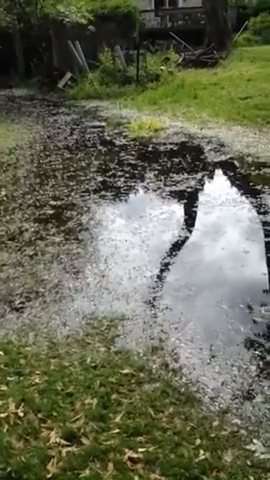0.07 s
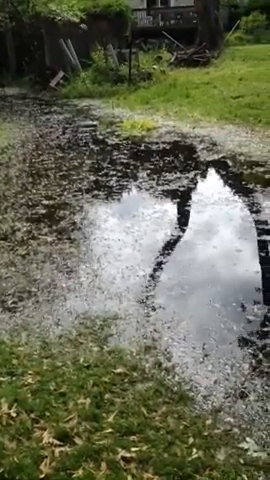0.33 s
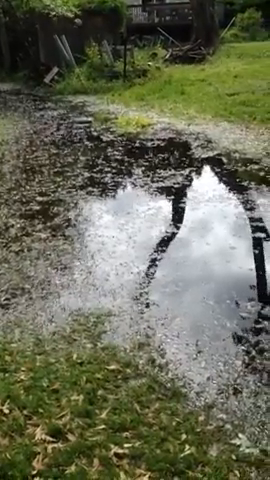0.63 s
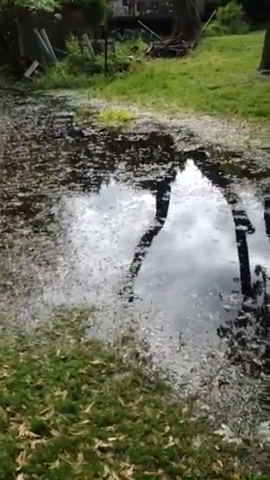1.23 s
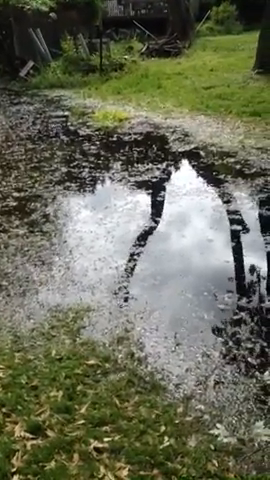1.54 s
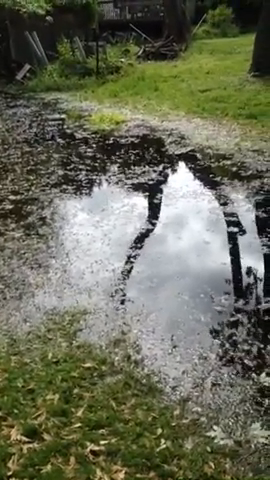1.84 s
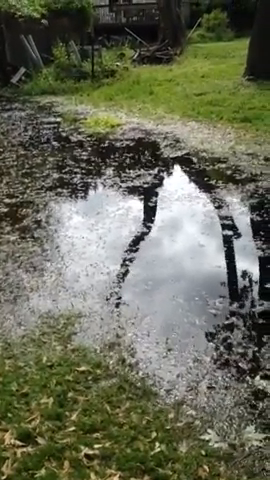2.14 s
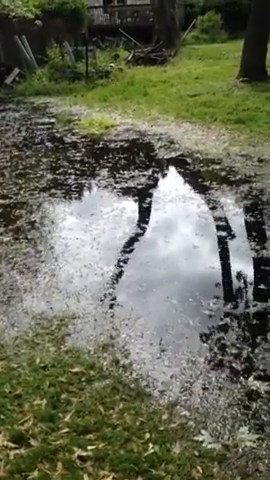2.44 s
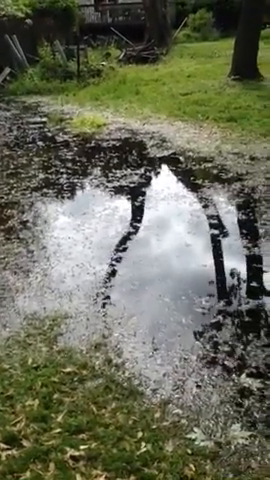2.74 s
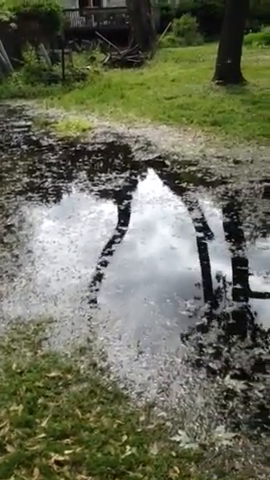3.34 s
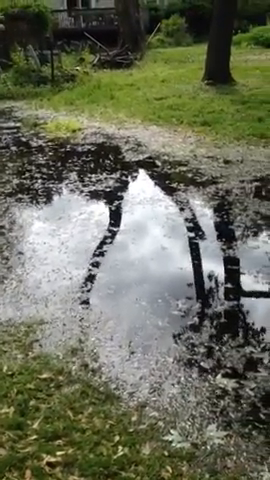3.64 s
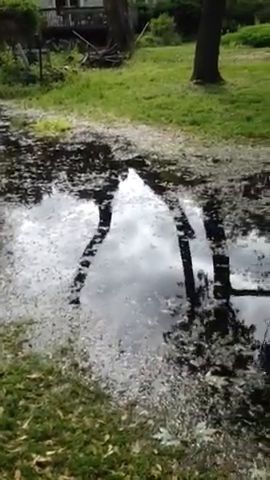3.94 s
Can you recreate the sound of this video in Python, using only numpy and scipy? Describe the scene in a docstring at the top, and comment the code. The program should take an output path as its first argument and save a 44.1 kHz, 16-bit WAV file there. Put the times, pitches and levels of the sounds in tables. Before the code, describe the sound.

Overlapping high, rapid toad trills ring out at a garden pond, thinning as some stop.

```python
"""Garden pond: four toads trill, each a train of short vocal-sac tone pulses at its own pitch and rate.
The lowest stops first, the next slows and stops, a third carries on, a faint high one joins.
The banks return light echoes; trees and lawn scatter a tail.
Behind: low rumble, soft hiss, a distant bird."""
import sys
import numpy as np
from scipy import signal
from scipy.fft import rfft, irfft
from scipy.io import wavfile

SR = 44100
rng = np.random.default_rng(int(sys.argv[2]) if len(sys.argv) > 2 else 0)


def inscribe(sig):
    """Save sig as 16-bit PCM at rate SR to the path in sys.argv[1].

    A 1-D sig is mono; a 2-D sig holds one channel per row.
    Samples are clipped to [-1, 1] before scaling.
    """
    pcm = np.round(np.clip(np.atleast_2d(sig).T, -1, 1) * 32767)
    wavfile.write(sys.argv[1], SR, pcm.astype(np.int16))


N = 176400

# Background spectra (frequency [Hz], relative level [dB])
RUMBLE_SPECTRUM = [(20, -47), (42, -10), (60, -6.5), (90, 1), (130, -3), (200, -10), (300, -19.5),
                   (600, -25.5), (2000, -55)]
HISS_SPECTRUM = [(30, -23), (300, 2.5), (550, -2.5), (800, 1.5), (1200, -2.5), (2400, -7.5), (3700, -5.5),
                 (4800, -7.5), (6500, -11), (10000, -12), (15500, -13)]
# Bird chirps (onset [s], level [dB])
BIRD_CHIRPS = [(.005, -61.5), (.515, -64.5), (1.915, -67.5), (2.512, -62.5)]
# Pitch within a chirp (time from onset [s], pitch [Hz])
CHIRP_PITCH_HZ = [(0, 5200), (.014, 4400), (.026, 3400), (.038, 3960), (.052, 3740), (.065, 3100)]
# Bank echoes (delay [s], gain [dB])
BANK_ECHOES = [(0.0115, -13.5), (0.0236, -21)]
# Toad pulse rates (time [s], rate [Hz])
HIGH_RATE_HZ = [(1.7, 49), (3, 47.8), (4, 46.2)]
LOW_RATE_HZ = [(0, 47.25), (.35, 47.665), (.9, 44.93), (1.17, 44.8)]
MID_RATE_HZ = [(0, 42.03), (.7, 41.7), (1.4, 41.6), (1.9, 40.05), (2.16, 32.7)]
STEADY_RATE_HZ = [(0, 36.85), (2, 37.12), (3, 36.48), (4, 36.9)]
# Toad levels before trim (time [s], level [dB])
HIGH_LEVEL_DB = [(1.7, -82), (2.2, -62), (3.2, -62), (4, -60.5)]
LOW_LEVEL_DB = [(0, -45.5), (.45, -44.5), (.8, -46.5), (1.14, -45.5)]
MID_LEVEL_DB = [(0, -42.5), (.25, -41.5), (.65, -39.5), (1.2, -40.5), (1.7, -41.5), (2.15, -41)]
STEADY_LEVEL_DB = [(0, -41.5), (.6, -43.5), (1.3, -43), (2, -42.5), (2.25, -44.5), (2.62, -43.5),
                   (2.75, -46.5), (3.05, -44), (3.3, -46), (3.48, -43), (3.7, -46), (4, -44)]
# Toad partials (frequency [x pitch], relative level [dB])
HIGH_TIMBRE = [(1, 0)]
LOW_TIMBRE = [(1, 2), (1.38, -27.5), (1.999, -40.5), (3.02, -36), (3.621, -34.5)]
MID_TIMBRE = [(1, 3), (2, -40.5), (3, -40.5)]
STEADY_TIMBRE = [(1, 1.5), (2, -41.5), (2.97, -36)]

TIME_S = np.arange(N) / SR
BINS_HZ = np.fft.rfftfreq(N, 1 / SR)


def amp(db):
    """dB to gain."""
    return 10 ** (np.asarray(db) / 20)


def unit_rms(x):
    """Scale to rms 1."""
    return x / np.sqrt(np.mean(x ** 2) + 1e-20)


def at(curve, time_s):
    """Linear table lookup."""
    return np.interp(time_s, *np.transpose(curve))


def delayed(x, delay_s):
    """Whole-sample delay."""
    return np.pad(x, (round(delay_s * SR), 0))[:N]


def drift(bandwidth_hz):
    """Smooth random signal, rms 1."""
    lowpass = np.exp(-(BINS_HZ / bandwidth_hz) ** 2)
    return unit_rms(irfft(rfft(rng.standard_normal(N)) * lowpass, N))


def noise(spectrum):
    """Shaped noise, rms 1."""
    hz, db = np.transpose(spectrum)
    gain = amp(np.interp(np.log(BINS_HZ + 1), np.log(hz), db))
    return unit_rms(irfft(rfft(rng.standard_normal(N)) * gain, N))


def background(hum_hz=63.9, swell_hz=5):
    """Distant rumble, wavering hum, even hiss."""
    hum_cycles = np.cumsum(hum_hz + 2 * drift(4.9)) / SR
    hum = np.sqrt(2) * np.sin(2 * np.pi * hum_cycles) * amp(-67.5 + 3 * drift(swell_hz))
    rumble = noise(RUMBLE_SPECTRUM) * amp(-60.5 + 1.6 * drift(swell_hz))
    hiss = noise(HISS_SPECTRUM) * amp(-64.5)
    return hum + rumble + hiss


def scatter(x, t60_s, echoes_per_s=2000):
    """Decaying echoes from trees and lawn."""
    lag_s = np.arange(SR // 2) / SR
    taps = rng.standard_normal(len(lag_s))
    taps *= (rng.random(len(lag_s)) < echoes_per_s / SR) & (lag_s > .005)
    taps *= np.exp(-np.log(1000) * lag_s / t60_s)
    return signal.fftconvolve(x, taps / np.linalg.norm(taps))[:N]


def bank_echoes(x):
    """Two reflections off the banks, slowly wavering in level."""
    return sum(amp(db) * (1 + .49 * drift(.67)) * delayed(x, delay_s) for delay_s, db in BANK_ECHOES)


def bird(chirp_s=.065):
    """Rasping chirps that dive, flick up and fall, smeared by the trees."""
    song = np.zeros(N)
    for onset_s, db in BIRD_CHIRPS:
        age_s = TIME_S - onset_s
        pitch_hz = at(CHIRP_PITCH_HZ, age_s) * (1 + .09 * drift(696))
        arch = np.maximum(np.sin(np.pi * np.clip(age_s / chirp_s, 0, 1)), 0)
        song += amp(db) * np.sqrt(arch) * np.sin(2 * np.pi * np.cumsum(pitch_hz) / SR)
    return amp(-2.5) * song + amp(-1.5) * scatter(song, t60_s=.38)


def trill(rate, level, timbre, start_s, stop_s, pitch_hz, sag_hz, pulse_s,
          taper, jitter_cycles, spread_db, trim_db, roughness, detune_hz=7):
    """Vocal-sac tone chopped into rounded pulses; pitch sags through each."""
    rate_hz = at(rate, TIME_S)
    count = np.cumsum(rate_hz) / SR
    count -= np.interp(start_s, TIME_S, count)
    pulse = np.round(count).astype(int)
    offset_s = (count - pulse) / rate_hz  # from pulse centre
    sounding = (pulse >= 0) & (pulse <= np.round(np.interp(stop_s, TIME_S, count)))
    shift, size, bend, stretch = rng.standard_normal((256, 4))[pulse].T  # drawn per pulse
    width_s = pulse_s * np.exp(.098 * stretch)
    envelope = np.maximum(np.cos(np.pi * np.clip(offset_s / width_s, -.5, .5)), 0) ** taper
    envelope *= sounding * amp(spread_db * size) * (1 + roughness * drift(340))
    cycles = pitch_hz * TIME_S + jitter_cycles * shift + detune_hz * bend * offset_s
    cycles -= sag_hz * offset_s ** 2 / (2 * pulse_s)
    voice = envelope * sum(amp(db) * np.sin(2 * np.pi * ratio * cycles) for ratio, db in timbre)
    return voice / np.std(voice[sounding]) * amp(at(level, TIME_S) + trim_db)


def high_toad():
    """Faint, far trill, blurred by echoes."""
    voice = trill(HIGH_RATE_HZ, HIGH_LEVEL_DB, HIGH_TIMBRE, start_s=1.707, stop_s=4.3,
                  pitch_hz=1969, sag_hz=30, pulse_s=.013, taper=1.2,
                  jitter_cycles=.34, spread_db=4.5, trim_db=-1, roughness=.14)
    return voice + amp(-2.5) * scatter(voice, t60_s=.25)


def low_toad(last_pulse_s=1.172):
    """Fast trill ending in one late, very short pulse."""
    voice = trill(LOW_RATE_HZ, LOW_LEVEL_DB, LOW_TIMBRE, start_s=.0157, stop_s=1.138,
                  pitch_hz=1499.4, sag_hz=49.4, pulse_s=.00994, taper=.71,
                  jitter_cycles=.2, spread_db=-.5, trim_db=3.5, roughness=.067)
    offset_s = TIME_S - last_pulse_s
    last_pulse = np.exp(-abs(offset_s) / .00062) * np.sin(2 * np.pi * 1480 * offset_s)
    return voice + amp(-33) * last_pulse


def mid_toad():
    """Trill that slows as the toad tires."""
    return trill(MID_RATE_HZ, MID_LEVEL_DB, MID_TIMBRE, start_s=.0219, stop_s=2.153,
                 pitch_hz=1651, sag_hz=11, pulse_s=.013, taper=.89,
                 jitter_cycles=.2, spread_db=.5, trim_db=-.5, roughness=.024)


def steady_toad(double_s=.01207, double_db=4.5):
    """Unbroken trill of doubled pulses, the second stronger."""
    voice = trill(STEADY_RATE_HZ, STEADY_LEVEL_DB, STEADY_TIMBRE, start_s=.00208, stop_s=4,
                  pitch_hz=1755, sag_hz=20, pulse_s=.01204, taper=.7,
                  jitter_cycles=.16, spread_db=1.5, trim_db=-5, roughness=.059)
    return voice - amp(double_db + 1.7 * drift(22)) * delayed(voice, double_s)


def scene():
    """Toads and echoes over background and bird; mono."""
    toads = low_toad() + mid_toad() + steady_toad()
    echoes = bank_echoes(toads) + amp(-15) * scatter(toads, t60_s=1)
    return (toads + echoes + high_toad() + background() + bird())[None]


def record(dry):
    """End fades and low-pass."""
    fade_s, cutoff_hz = .004, 15450
    edge_s = np.minimum(TIME_S, TIME_S[::-1])
    fade = np.sin(np.pi / 2 * np.minimum(edge_s / fade_s, 1)) ** 2
    lowpass = signal.firwin(511, cutoff_hz, window=("kaiser", 9), fs=SR)
    return signal.oaconvolve(dry * fade, lowpass[None], "same")


dry = scene()
out = record(dry)
inscribe(out)
```